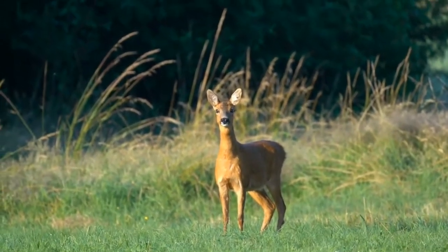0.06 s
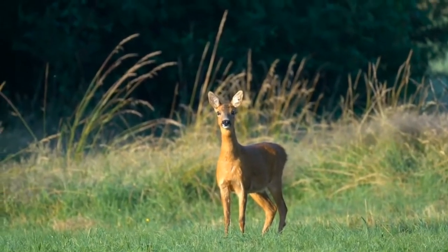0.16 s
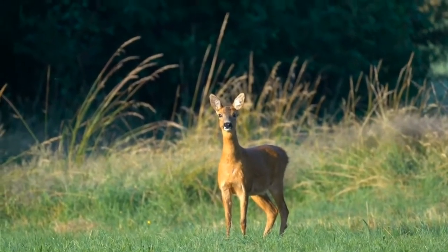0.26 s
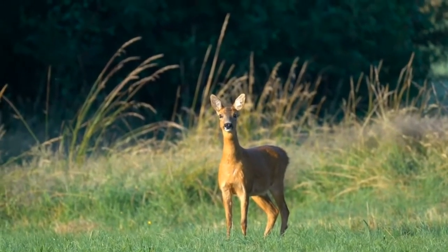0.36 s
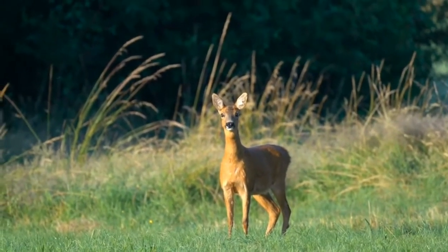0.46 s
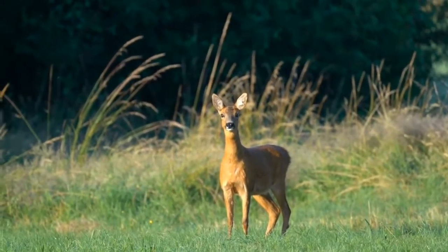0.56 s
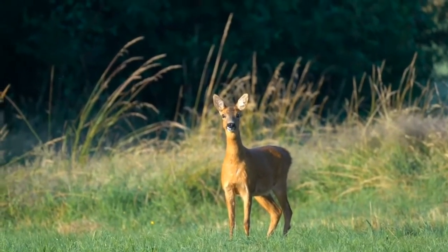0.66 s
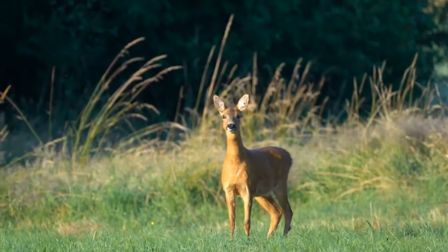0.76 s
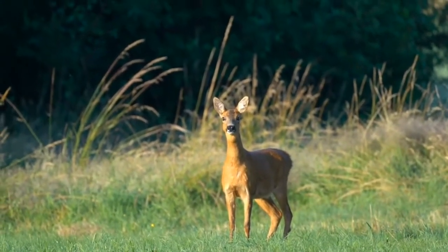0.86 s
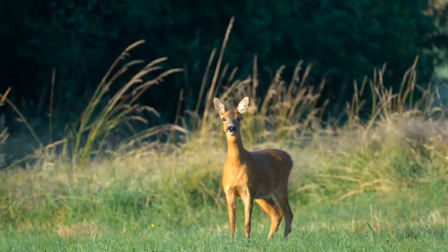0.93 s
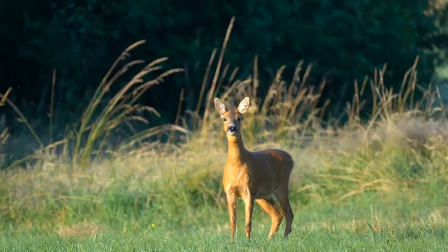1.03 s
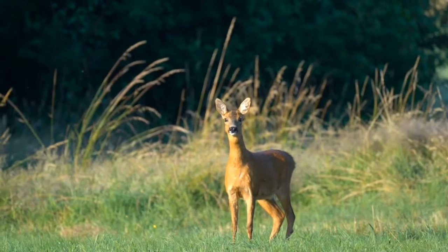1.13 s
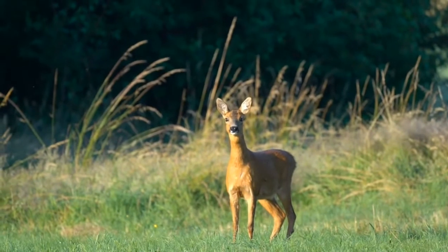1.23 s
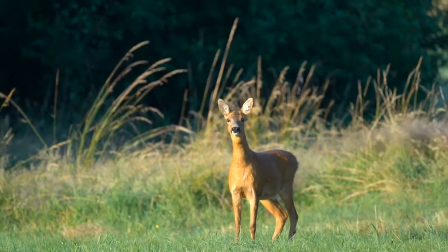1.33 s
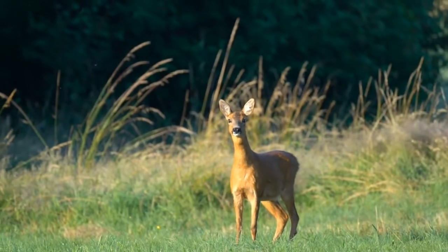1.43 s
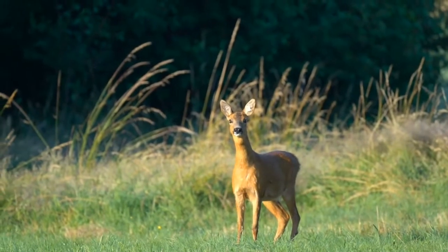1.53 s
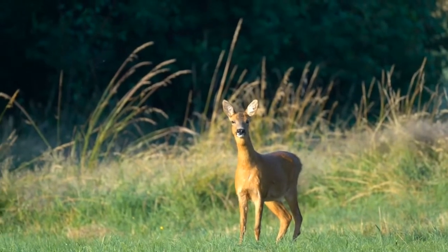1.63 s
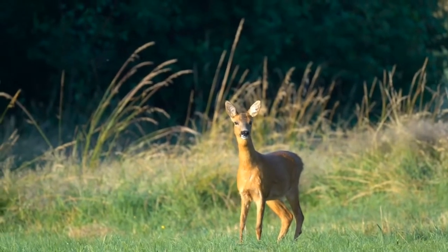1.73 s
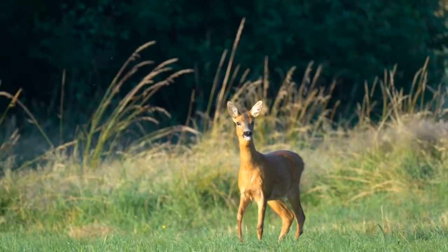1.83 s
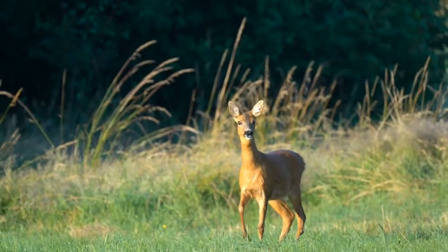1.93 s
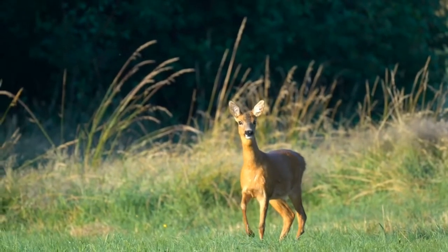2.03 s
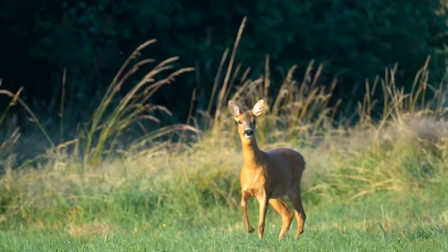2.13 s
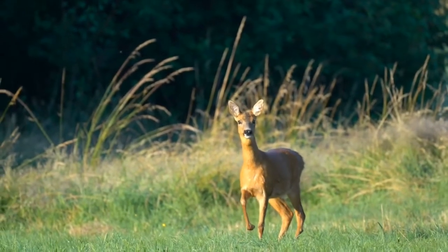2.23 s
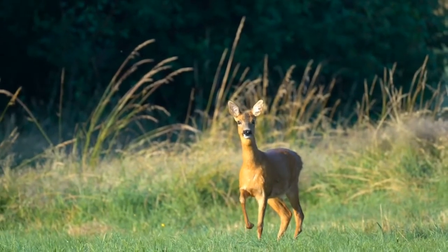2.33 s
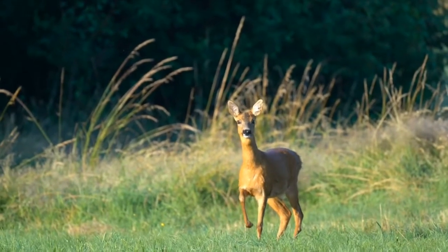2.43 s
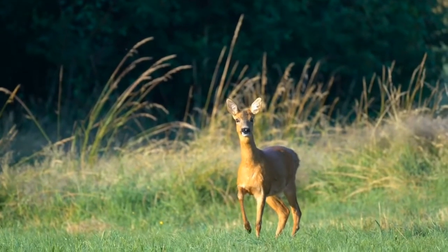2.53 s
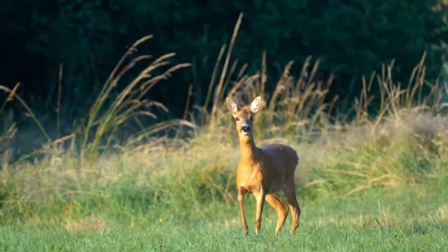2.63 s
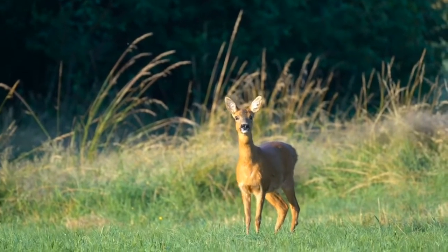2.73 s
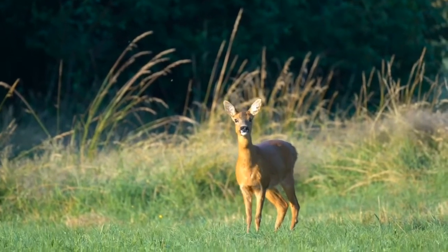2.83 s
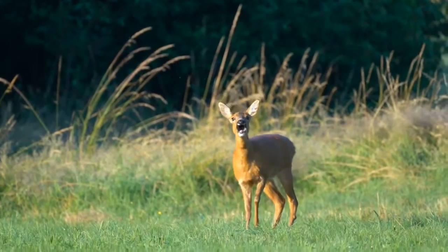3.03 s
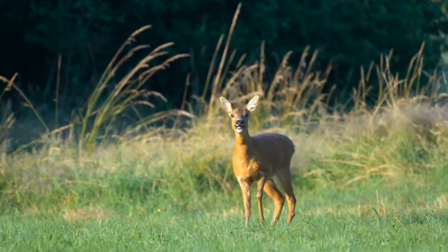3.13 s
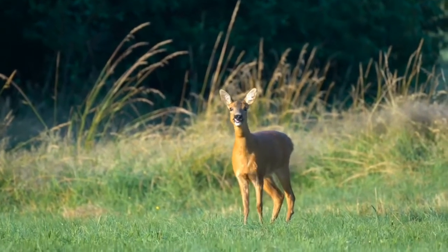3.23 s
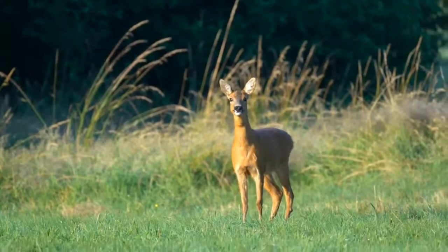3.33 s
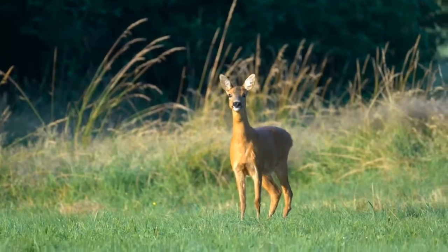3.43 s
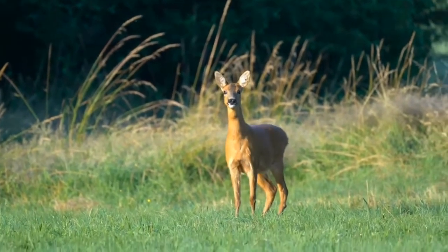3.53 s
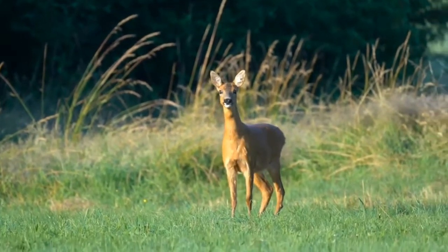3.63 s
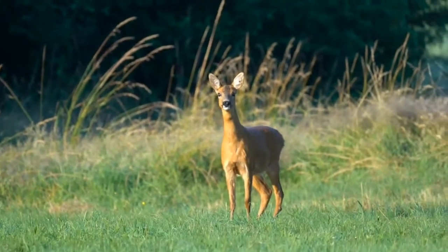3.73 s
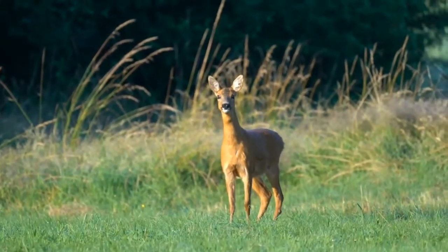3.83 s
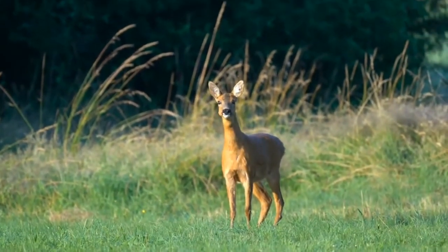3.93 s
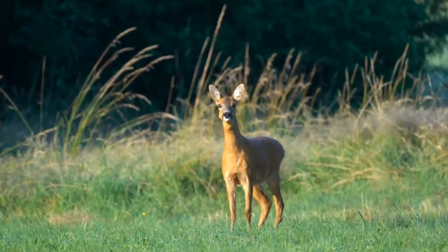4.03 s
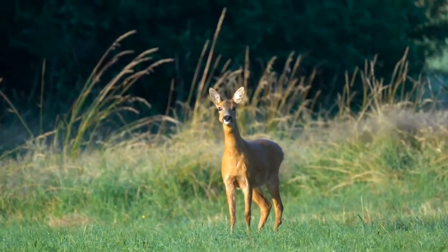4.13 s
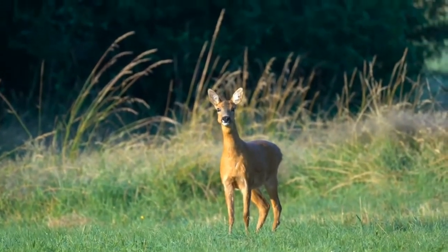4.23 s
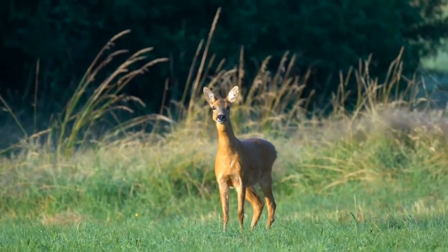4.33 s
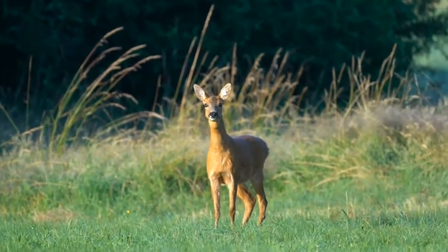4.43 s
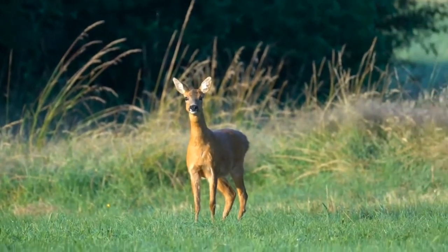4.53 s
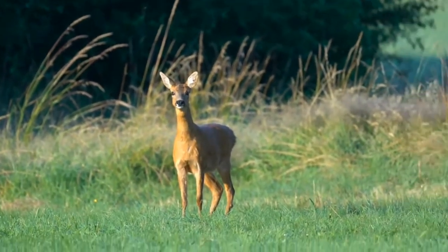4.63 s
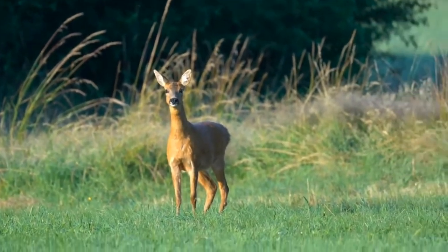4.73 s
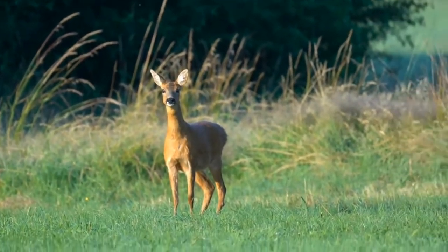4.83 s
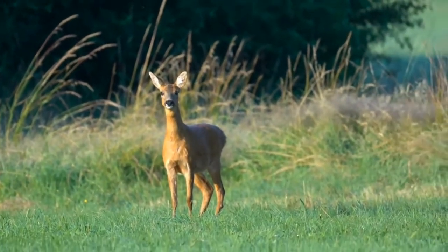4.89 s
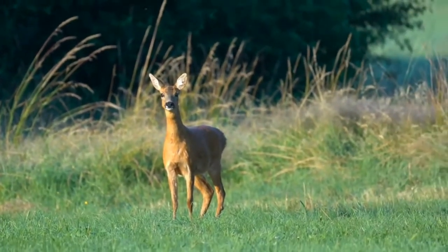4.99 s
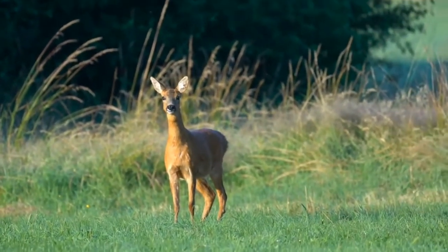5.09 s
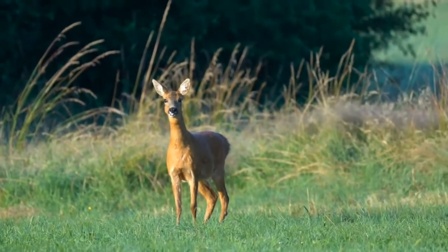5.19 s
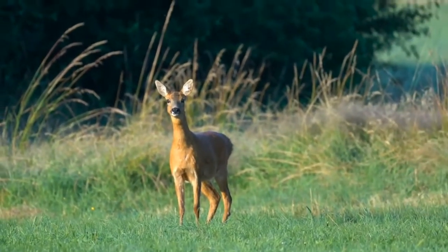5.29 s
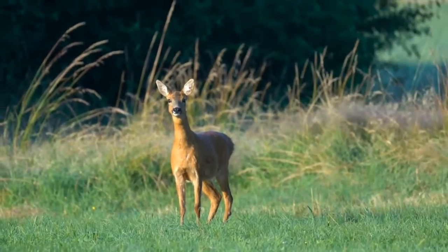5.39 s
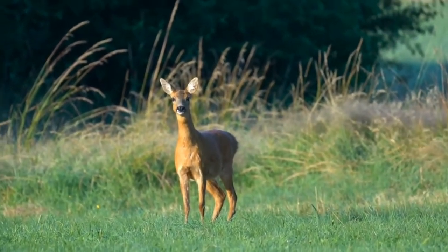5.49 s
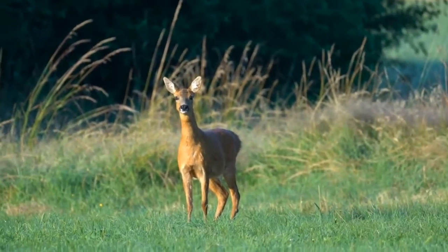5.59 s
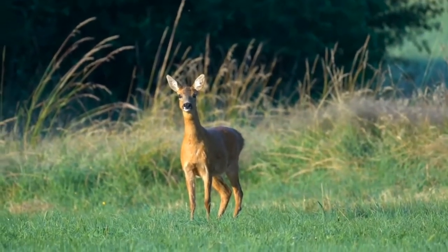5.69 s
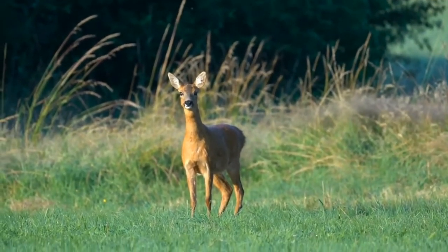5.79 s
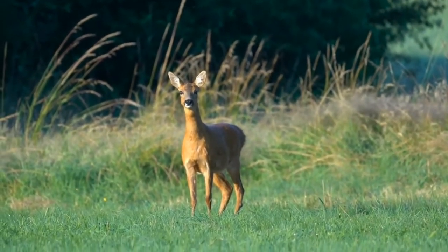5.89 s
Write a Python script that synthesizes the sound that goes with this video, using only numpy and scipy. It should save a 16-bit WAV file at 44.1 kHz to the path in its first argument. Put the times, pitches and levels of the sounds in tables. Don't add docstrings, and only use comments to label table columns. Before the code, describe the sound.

Quiet meadow with soft air, hiss and many faint bird chirps left, ahead and right, plus a faint insect hum and cricket rasps. Midway a roe deer lets out one rough, explosive bark, slightly right, and the wood edge returns a fading echo mostly from the left. Harsh chirps follow, then a hard click from the camera body beside the stereo microphone, and more chirps at right.

```python
import sys
import numpy as np
from scipy import signal
from scipy.fft import rfft, irfft
from scipy.io import wavfile
from scipy.ndimage import uniform_filter1d

SR = 44100
rng = np.random.default_rng(int(sys.argv[2]) if len(sys.argv) > 2 else 0)


def how_loud(loudness_db):
    steps = np.asarray(loudness_db, float) / 20
    return 10 ** steps


def file_out(sig):
    cols = np.atleast_2d(sig).T
    lim = np.clip(cols, -1, 1)
    pcm = np.round(lim * 32767).astype(np.int16)
    wavfile.write(sys.argv[1], SR, pcm)


N = 262395

# (time [s], peak level [dB], dullness corner [Hz])
TICKS = [
    (4.5847, -37, 19600),
    (4.5854, -23, 26300),
    (4.5865, -35.5, 2550),
    (4.587, -32.5, 2480),
    (4.5883, -49, 1500),
    (5.015, -50, 12000),
    (5.945, -40.5, 9000),
]


def rms_one(x):
    return x / np.sqrt(np.mean(x ** 2) + 1e-20)


def in_time(rows, outside=None):
    s, *columns = np.transpose(rows)
    t = np.arange(N) / SR
    return [np.interp(t, s, c, outside, outside) for c in columns]


def at_hz(points, hz, column=1):
    points = np.array(points)
    return np.interp(np.log(hz + 1), np.log(points[:, 0]), points[:, column])


def drift(rate_hz):
    r = np.exp(-2 * np.pi * rate_hz / SR)
    noise = rng.standard_normal(N + SR)
    return rms_one(signal.lfilter([1], [1, -2 * r, r * r], noise)[SR:])


def resonate(x, hz, width_hz):
    r = np.exp(-np.pi * width_hz / SR)
    zeros = [(1 - r * r) / 2, 0, (r * r - 1) / 2]
    poles = [1, -2 * r * np.cos(2 * np.pi * hz / SR), r * r]
    return signal.lfilter(zeros, poles, x + 1e-18)


def highpass(x, order, hz):
    return signal.lfilter(*signal.butter(order, hz, "high", fs=SR), x)


def bandpass(x, low_hz, high_hz):
    return signal.sosfilt(signal.butter(2, [low_hz, high_hz], "band", fs=SR, output="sos"), x)


def coloured(spectrum):
    white = rfft(rng.standard_normal(N))
    gain = how_loud(at_hz(spectrum, np.linspace(0, SR / 2, len(white))))
    return rms_one(irfft(white * gain, N))


def place(x, pan_db, side):
    lag_samples = 7
    left = np.roll(x, int(lag_samples * max(side, 0))) * how_loud(pan_db / 2)
    right = np.roll(x, int(lag_samples * max(-side, 0))) * how_loud(-pan_db / 2)
    return np.array([left, right])


def impulses(rows):
    out = np.zeros(N)
    for s, db in rows:
        out[round(s * SR)] = how_loud(db)
    return out


def air():
    # (time [s], level from the left [dB], level from the right [dB])
    air_level = [(0, -68, -63), (.4, -69.5, -65.5), (.6, -69, -74.5), (1.5, -67, -68), (2.2, -74.5, -70.5),
                 (3, -77, -69), (4, -70, -67.5), (4.9, -70.5, -66), (5.2, -73.5, -74), (5.95, -69.5, -66.5)]
    # (frequency [Hz], density [dB/Hz])
    air_colour = [(25, -37), (54, -31.5), (198, -15), (435, -5.5), (1370, -5.5), (4300, -9), (6000, -17),
                  (13200, -100)]
    # (frequency [Hz], density [dB/Hz])
    wind_colour = [(15, -60), (35, -7), (70, 14), (160, -4), (300, -16), (600, -90)]
    # (frequency [Hz], density [dB/Hz])
    hiss_colour = [(2060, -5.5), (3500, -1.5), (4100, -13), (5860, 0), (8150, -0.5), (15100, -3.5),
                   (16000, -7)]
    # (time [s], level [dB])
    hiss_drift = [(0, 3.5), (2.15, 1.7), (2.3, 0.7), (3, 1.1), (3.4, 2.5), (4, 2.5), (5.95, 1)]
    wind_db, hiss_db, hiss_side_db = -90, -69, -12.5

    left_db, right_db = in_time(air_level)
    left = place(coloured(air_colour) * how_loud(left_db + drift(23)), 5.2, -1.37)
    right = place(coloured(air_colour) * how_loud(right_db + drift(0.52)), -0.78, 0.83)
    diffuse = how_loud(-67) * np.array([coloured(air_colour), coloured(air_colour)])
    wind = np.array([how_loud(wind_db + drift(4.9)) * coloured(wind_colour) for port in range(2)])
    mid, side = coloured(hiss_colour), coloured(hiss_colour)
    hiss = how_loud(hiss_db + in_time(hiss_drift)[0]) * (mid + how_loud(hiss_side_db) * side * [[1], [-1]])
    return left + right + diffuse + wind + hiss


def hum():
    # (time [s], lower level [dB], upper level [dB])
    hum_level = [(.35, -100, -97), (.6, -77, -93), (.85, -77, -80), (2.15, -78, -79.5), (2.3, -88, -82),
                 (2.75, -80, -82), (2.95, -92, -78)]
    start_hz, sag_hz_per_s, upper_hz, upper_width_hz = 494, 7, 1026, 33
    low_db, high_db = in_time(hum_level, outside=-120)
    hz = start_hz - sag_hz_per_s * np.arange(N) / SR
    phase = 2 * np.pi * np.cumsum(hz * (1 + .004 * drift(14))) / SR
    low = np.sin(phase) * how_loud(low_db + 2.5 * drift(22))
    high = rms_one(resonate(rng.standard_normal(N), upper_hz, upper_width_hz))
    return place(np.sqrt(2) * low + high * how_loud(high_db), 1.0, 0)


def rasps():
    # (time [s], length [s], low edge [Hz], high edge [Hz], level [dB])
    bursts = [
        (0.093, 0.17, 4300, 9500, -68.5),
        (0.705, .15, 6200, 7400, -75.5),
        (1.027, 0.17, 6500, 7300, -76),
        (1.304, 0.16, 6000, 9400, -67),
        (1.924, 0.28, 6100, 9300, -72.5),
    ]
    out, t = np.zeros(N), np.arange(N) / SR
    noise = rng.standard_normal(N) * how_loud(1.7 * drift(30))
    for s, length, low_hz, high_hz, db in bursts:
        u = (t - s) / length * 2 - 1
        out += how_loud(db) * rms_one(bandpass(noise, low_hz, high_hz)) * np.sqrt((1 - u ** 2).clip(0))
    return place(out, -4.5, 0)


def glides(rows, done_halfway=.56):
    return [(s, length, a, a + done_halfway * (b - a), b, db) for s, length, a, b, db in rows]


def pips(rows):
    return [(s, length, hz, hz, hz, db) for s, length, hz, db in rows]


def dips(rows):
    start_ratio, end_ratio = 1 + 0.115, 1 + 0.063
    return [(s, length, hz * start_ratio, hz, hz * end_ratio, db) for s, length, hz, db in rows]


def birds(notes, warble, warble_hz, flutter_db, ring_db, ring_s):
    out, wobble, flutter = np.zeros(N), drift(warble_hz), drift(warble_hz)
    for s, length, start_hz, mid_hz, end_hz, db in notes:
        at = np.arange(round(s * SR), min(round((s + length) * SR), N))
        u = (at / SR - s) / length * 2 - 1
        hz = mid_hz + (end_hz - start_hz) / 2 * u + ((end_hz + start_hz) / 2 - mid_hz) * u ** 2
        tone = np.sin(2 * np.pi * np.cumsum(hz * (1 + warble * wobble[at])) / SR)
        swell = (1 - u ** 2).clip(0) ** 0.19
        out[at] += np.sqrt(2) * how_loud(db + flutter_db * flutter[at]) * swell * tone
    t = np.arange(SR // 2) / SR
    leaves = rng.standard_normal(len(t)) * how_loud(-60 * t / ring_s)
    return out + how_loud(ring_db) * signal.fftconvolve(out, leaves / np.linalg.norm(leaves))[:N]


def left_bird():
    # (time [s], length [s], start [Hz], end [Hz], level [dB])
    slides = [(.141, 0.027, 3380, 3950, -58.5), (.334, 0.027, 3420, 4030, -64),
              (.535, 0.027, 3380, 3630, -61), (.562, 0.034, 3660, 3560, -60),
              (.538, 0.0091, 4470, 5560, -63), (.655, 0.013, 5120, 4150, -57.5),
              (.765, 0.018, 4900, 5000, -68), (.981, 0.052, 2950, 3070, -64),
              (1.055, 0.012, 5400, 4800, -68), (1.07, .014, 4900, 4700, -63),
              (2.938, 0.02, 3480, 3420, -67), (3.77, 0.015, 2110, 1900, -61)]
    # (time [s], length [s], lowest pitch [Hz], level [dB])
    dipping = [
        (2.162, 0.075, 2930, -65),
        (2.372, 0.075, 2780, -67),
    ]
    return place(birds(glides(slides) + dips(dipping), 0.017, 110, 2.3, -3.0, .55), 6.4, -0.86)


def birds_ahead():
    # (time [s], length [s], start [Hz], end [Hz], level [dB])
    slides = [(.222, .01, 5300, 4400, -70), (.23, 0.06, 4300, 3690, -66), (2.872, 0.054, 3200, 3040, -69.5),
              (.379, 0.0215, 4770, 5300, -61.5), (.398, 0.052, 5240, 4680, -61),
              (.398, 0.071, 4460, 3760, -63.5), (.246, .03, 8400, 7900, -66), (.49, 0.035, 3400, 3140, -72),
              (.55, 0.03, 4670, 4130, -68), (.632, 0.0072, 6640, 5000, -60),
              (.843, 0.067, 4000, 3480, -67.5), (1.154, 0.014, 2760, 2440, -59),
              (1.262, 0.023, 3810, 3430, -65.5), (1.385, .07, 4000, 4280, -71),
              (2.56, 0.024, 3770, 3400, -70), (3.622, 0.016, 2870, 2700, -66),
              (5.708, 0.037, 3660, 4020, -68.5), (5.928, 0.013, 5420, 5570, -59),
              (.288, .06, 3720, 3560, -74)]
    # (time [s], length [s], pitch [Hz], level [dB])
    level_notes = [(.133, .01, 4400, -66), (.179, 0.022, 3560, -64), (.226, .029, 7600, -73),
                   (.969, 0.01, 4700, -68), (.979, 0.019, 4100, -71), (1.165, 0.019, 3530, -65.5),
                   (1.193, 0.0048, 3460, -65), (1.208, 0.014, 3240, -68), (1.322, .017, 4640, -70),
                   (1.37, .026, 3600, -66.5), (1.581, .0093, 4650, -65), (1.593, 0.014, 1870, -69.5),
                   (1.669, 0.021, 4660, -72.5), (2.32, 0.04, 2950, -73), (1.965, .05, 2150, -72),
                   (2.852, 0.022, 3130, -73), (4.195, 0.032, 3550, -70.5), (4.44, 0.056, 2874, -69.5),
                   (4.665, 0.019, 3010, -71), (4.73, 0.034, 3090, -72), (4.99, 0.06, 3240, -77)]
    return place(birds(glides(slides) + pips(level_notes), 0.015, 170, 2.2, -4, 0.5), -3.1, 0)


def right_bird():
    # (time [s], length [s], start [Hz], end [Hz], level [dB])
    slides = [(.11, 0.0074, 2460, 2460, -56), (.124, .028, 2580, 2710, -53.5),
              (.161, .014, 6300, 5740, -75), (.568, 0.012, 5980, 5590, -68.5),
              (.6392, 0.00069, 8200, 7800, -47.5), (.748, 0.013, 2900, 2450, -54),
              (.78, 0.014, 2010, 2550, -58), (.788, 0.013, 2440, 2860, -54),
              (.802, 0.013, 2960, 3370, -51.5), (.366, 0.0098, 5000, 6000, -62),
              (.873, 0.034, 2410, 1770, -66), (.905, 0.047, 3060, 3430, -65),
              (1.195, 0.057, 2010, 1810, -65.5), (1.85, 0.1, 1800, 2210, -70),
              (1.919, 0.085, 2286, 2470, -69.5), (2.09, 0.057, 2540, 2200, -66),
              (5.328, 0.015, 4620, 5270, -62), (5.344, 0.0091, 5180, 4640, -62),
              (3.845, 0.018, 2580, 3050, -68), (5.045, 0.045, 4470, 5730, -74),
              (5.457, .008, 4750, 5050, -64), (5.468, .01, 5100, 5400, -65), (5.12, 0.04, 5780, 5000, -68),
              (5.235, 0.034, 4340, 4200, -56.5), (5.745, 0.011, 5800, 4470, -59.5),
              (5.76, 0.013, 5400, 4320, -58), (5.772, 0.012, 5000, 4230, -62)]
    # (time [s], length [s], start [Hz], end [Hz], level [dB])
    hooks = [
        (.203, .012, 2950, 2300, -59),
        (.213, 0.042, 2242, 1993, -61.5),
        (5.352, 0.029, 4600, 3754, -57),
    ]
    # (time [s], length [s], pitch [Hz], level [dB])
    level_notes = [(.791, 0.054, 1830, -72), (.815, 0.021, 3240, -63), (1.011, 0.03, 3780, -63.5),
                   (1.035, 0.011, 1800, -67), (1.05, 0.0094, 1980, -64), (1.074, 0.012, 2210, -60.5),
                   (1.092, 0.014, 2170, -60), (1.28, 0.046, 2430, -65), (2.15, 0.055, 2030, -73),
                   (5.249, 0.023, 3530, -67), (.377, .034, 5900, -61), (5.437, 0.016, 4210, -59.5),
                   (5.784, 0.013, 3440, -59)]
    # (time [s], length [s], lowest pitch [Hz], level [dB])
    dipping = [
        (5.565, 0.081, 3076, -66),
    ]
    notes = glides(slides) + glides(hooks, done_halfway=0.79) + pips(level_notes) + dips(dipping)
    return place(birds(notes, 0.02, 190, 3.2, -5, 0.5), -9.0, 1.0)


def sparrow():
    # (time [s], length [s], top [Hz], level [dB])
    upstrokes = [(3.835, 0.017, 5300, -67), (3.852, 0.0146, 5900, -64), (3.951, 0.0079, 6210, -55.5),
                 (4.288, 0.0097, 6000, -65)]
    # (time [s], length [s], top [Hz], level [dB])
    downstrokes = [(3.864, .014, 6130, -54), (3.874, 0.0083, 5680, -60), (3.958, 0.0089, 6480, -57),
                   (4.1, .007, 5770, -64), (4.301, 0.0084, 6060, -62)]
    # (time [s], length [s], pitch [Hz], level [dB])
    level_notes = [(3.845, 0.018, 4640, -60), (3.9315, 0.007, 4900, -50.5), (4.077, 0.012, 5350, -65),
                   (4.088, 0.011, 5650, -63), (4.196, 0.006, 5200, -72), (4.275, 0.015, 4990, -59.5)]
    low_hz = 4464
    up = [(s, length, low_hz, hz, db) for s, length, hz, db in upstrokes]
    down = [(s, length, hz, low_hz, db) for s, length, hz, db in downstrokes]
    return place(birds(glides(up + down) + pips(level_notes), 0.025, 490, 4.8, -6.5, 0.2), 1.3, -1)


def buzzes():
    # (time [s], length [s], start [Hz], end [Hz], level [dB])
    ahead = [(.65, .01, 4200, 4130, -61), (.658, 0.0115, 4050, 3700, -62.5),
             (.671, 0.0288, 3250, 2550, -59), (0.78, .03, 6300, 4500, -76), (3.747, .025, 3150, 2800, -64),
             (3.749, .016, 2750, 2250, -62), (3.77, .006, 4000, 2000, -63), (1.4, 0.12, 4700, 4500, -76),
             (1.15, .04, 3300, 3500, -72), (5.938, .014, 5500, 6100, -55)]
    # (time [s], length [s], start [Hz], end [Hz], level [dB])
    right = [
        (5.215, 0.027, 4400, 4300, -64),
        (5.533, 0.031, 4030, 3940, -59),
        (5.852, 0.078, 3240, 3350, -65),
    ]
    ahead_sound = place(birds(glides(ahead), 0.0434, 390, 4.9, -3.5, .55), -3.2, 0)
    return ahead_sound + place(birds(glides(right), .035, 270, 3.4, -14, 0.3), -8.0, 1)


def ticks():
    # (frequency [Hz], level [dB], t60 [s])
    body_modes = [(288, -28, 0.14), (1280, -10, 0.034), (2030, 1.5, 0.0063), (2700, -12, 0.0037),
                  (3330, -3.5, 0.012), (4160, -1, 0.017), (5300, 20.5, 0.0046), (7150, 15, 0.0065),
                  (9750, 29, 0.0014), (12800, 19, 0.0045)]
    out, t = np.zeros(N), np.arange(SR // 30) / SR
    for s, db, dull_hz in TICKS:
        tick = 0
        for hz, mode_db, t60 in body_modes:
            decay = how_loud(mode_db - 60 * t / t60 - 5.3 * (hz / dull_hz) ** 2)
            tick = tick + decay * np.sin(2 * np.pi * hz * t)
        piece = out[round(s * SR):][:len(t)]
        piece += how_loud(db) * tick[:len(piece)] / np.abs(tick).max()
    return highpass(out, 2, 220)


def settles():
    # (time [s], peak level [dB])
    shifts = [
        (4.5885, -50),
        (4.9002, -44),
        (4.9012, -46),
    ]
    # (frequency [Hz], level [dB], t60 [s])
    strap_modes = [(790, 1, .02), (2150, -3, .007), (2950, 1, .008), (3450, -5, .005), (5100, 1, .007)]
    t = np.arange(SR // 30) / SR
    knock = sum(how_loud(db - 60 * t / t60) * np.sin(2 * np.pi * hz * t) for hz, db, t60 in strap_modes)
    knock = highpass(knock, 2, 500)
    return signal.lfilter(knock / np.abs(knock).max(), [1], impulses(shifts))


def shell(x):
    flex_hz, flex_width_hz, flex_db = 2090, 900, 1
    hard = impulses([(s, db - 7.3 * (4000 / dull_hz) ** 2) for s, db, dull_hz in TICKS])
    unit_peak = resonate(np.eye(1, 40)[0], flex_hz, flex_width_hz).max()
    flex = resonate(hard, flex_hz, flex_width_hz) / unit_peak
    return place(x, -1.6, 0) + how_loud(flex_db) * flex * [[1], [-1]] + how_loud(-8.0) * x * [[-1], [1]]


def throat(source):
    # (frequency [Hz], width [Hz], level [dB])
    formants = [(690, 85, -9), (1220, 227, -5), (1922, 144, 3), (2820, 184, -5), (4140, 740, -25),
                (6100, 760, -24.5), (9800, 1500, -35), (13700, 830, -46)]
    voiced = 0
    for k, (hz, width_hz, db) in enumerate(formants):
        voiced = voiced + (-1) ** k * how_loud(db) * resonate(source, hz, width_hz)
    return signal.sosfilt(signal.butter(4, 520, "high", fs=SR, output="sos"), voiced)


def slap(rows):
    bite_to_snap = .25
    hardest_db, snap_loss_db_per_db = -15, .1
    snap_hz, snap_width_hz, snap_db, edge_db = 2650, 850, 3, -31
    hard = impulses([(s, db + snap_loss_db_per_db * min(db - hardest_db, 0) + bite_to_snap * bite_db)
                     for s, db, bite_db in rows])
    ring = impulses([(s, db - (1 - bite_to_snap) * bite_db) for s, db, bite_db in rows])
    snap = highpass(resonate(hard, snap_hz, snap_width_hz), 2, 1400)
    edge = signal.lfilter(*signal.butter(1, [4600, 10000], "band", fs=SR), hard)
    soft = signal.lfilter(*signal.butter(4, 3250, fs=SR), throat(ring) + how_loud(snap_db) * snap)
    return soft + how_loud(edge_db) * edge


def bark():
    # (time [s], level [dB], mouth brightness [dB])
    effort = [
        (3.085, -82, 0),
        (3.099, -41, 0),
        (3.112, -36, 2),
        (3.126, -28.5, 3),
        (3.2, -30.5, 5),
        (3.236, -28.5, 7),
        (3.292, -30.5, 1),
        (3.308, -46, 4),
    ]
    # (time [s], peak level [dB], bite: snap over throat ring [dB])
    slaps = [(3.1005, -38, -6), (3.1073, -35, 5), (3.1113, -30, 0), (3.1174, -26, 4), (3.1231, -20, -1),
             (3.1285, -22, -6), (3.1333, -19.5, -1), (3.1363, -24, -4), (3.1424, -26, 0), (3.1476, -22, -3),
             (3.1527, -19, 2), (3.162, -18, 0), (3.1672, -16.5, 6), (3.1699, -22, 0), (3.1772, -27, -3),
             (3.185, -23, -1), (3.1902, -16, 2), (3.1938, -22, -8), (3.2031, -26, -5), (3.2097, -24, 5),
             (3.2136, -16.5, 4), (3.2231, -18, 10), (3.2238, -19, 8), (3.2279, -15, 5), (3.2331, -17, 5),
             (3.2374, -24, 0), (3.2432, -27, 0), (3.2469, -17, 5), (3.2524, -20, -1), (3.2565, -22, -9),
             (3.2616, -24, 1), (3.2662, -23, 3), (3.273, -26, 0), (3.2776, -20, 0), (3.2896, -20.5, -4),
             (3.2927, -26, -2)]
    fold_hz, fold_jitter, fold_spread_db, breath_db = 230, .35, 2.5, 6.0
    hoarse_db, closure_db, even_s, even_share = -9, 2.5, .005, .5

    level_db, bright_db = in_time(effort, outside=-120)
    cycles = np.cumsum(fold_hz * (1 + fold_jitter * drift(150)).clip(.2) / SR)
    pulses = np.diff(np.floor(cycles), prepend=0) * how_loud(fold_spread_db * rng.standard_normal(N))
    puffs = signal.lfilter([1], [1, -.994], pulses) * rng.standard_normal(N)
    roar = rms_one(throat(rms_one(pulses) + how_loud(breath_db) * rms_one(puffs)))
    swell = uniform_filter1d(roar ** 2, size=round(even_s * SR)).clip(1e-6) ** (even_share / 2)
    hoarse = rms_one(roar / swell) * how_loud(level_db + hoarse_db)
    highs = highpass(hoarse, 1, 2300)
    unit_peak = np.abs(slap([(0, 0, 0)])).max()
    return hoarse + (how_loud(bright_db) - 1) * highs - how_loud(closure_db) * slap(slaps) / unit_peak


def direct(x):
    shade_hz, shade_db = 1110, -9.5
    low = signal.lfilter(*signal.butter(1, shade_hz, fs=SR), x)
    return np.array([low + how_loud(shade_db) * (x - low), x])


def grass(x):
    grass_hz, t60_s, level_db, flutter_hz = 3600, .045, -5.0, 250
    t = np.arange(SR // 20) / SR
    blades = rng.standard_normal((2, len(t))) * how_loud(-60 * t / t60_s)
    blades = blades / np.linalg.norm(blades, axis=1, keepdims=True)
    scattered = signal.fftconvolve(highpass(x, 2, grass_hz)[None], blades, axes=1)[:, :N]
    return how_loud(level_db) * scattered * [drift(flutter_hz), drift(flutter_hz)]


def wood(x):
    # (frequency [Hz], t60 [s], left level [dB], right level [dB])
    wood_bands = [(500, 1.77, 7.5, 3.5), (650, 1.49, 10.5, 8.5), (930, 1.58, 7, 1), (1324, 1.49, 6.5, 0.5),
                  (1640, 1.16, -4, -4), (1970, 1.11, 4.5, -2), (2300, 0.76, 1.5, 1), (2710, 0.62, 2, -2.5),
                  (5000, 0.71, 2, -2), (12000, 0.64, 3, 0)]
    # (delay [s], level [dB])
    wood_depth = [(0, 0), (.4, 1), (.5, -2.0), (2, -1.0)]
    rise_s, sway_s, sway_hz = 0.063, .00022, 28
    size = 2 * SR
    t = np.arange(size) / SR
    shared, own = rng.standard_normal(size), rng.standard_normal((2, size))
    noise = place(shared, 0, -0.75) * 1.02 + own * 0.37
    edges_hz, echo = 420 * 2 ** (np.arange(21) / 4), 0
    for low_hz, high_hz in zip(edges_hz, edges_hz[1:]):
        hz = np.sqrt(low_hz * high_hz)
        sides = how_loud(np.array([[at_hz(wood_bands, hz, column)] for column in (2, 3)]))
        decay = how_loud(-60 * t / at_hz(wood_bands, hz))
        echo = echo + sides * bandpass(noise, low_hz, high_hz) * decay
    rise = 1 - np.exp(-(t / rise_s) ** 2)
    echo = echo * rise * how_loud(np.interp(t, *np.transpose(wood_depth))) / np.sqrt(SR / 10)
    heard = signal.fftconvolve(x[None], echo, axes=1)[:, :N]
    path = np.arange(N) + sway_s * SR * drift(sway_hz)
    return np.array([np.interp(path, np.arange(N), port) for port in heard])


def scene():
    background = air() + hum() + rasps()
    songbirds = left_bird() + birds_ahead() + right_bird() + sparrow() + buzzes()
    camera = shell(ticks() + settles())
    voice = bark()
    deer = direct(voice) + grass(voice) + wood(voice)
    return background + songbirds + camera + deer


def gain_steps():
    # (beat number [-], thud level [dB], edge level [dB], left over right [dB])
    steps = [(0, -50.5, -50, -7), (1, -65, -50, -3), (2, -51, -56, -3.5), (3, -65, -47, 14),
             (4, -44, -47, -4.5), (5, -61, -55, -12), (6, -57, -51, 4), (8, -62, -40, 6), (10, -58, -62, 6),
             (11, -61, -46, 13), (13, -65, -44, 5), (15, -68, -35, -4), (17, -56.5, -60, 8),
             (19, -69, -62, 13)]
    clock_start_s, clock_s = 3.1405, .02108
    out, k = np.zeros((2, N)), np.arange(80)
    for beat, thud_db, edge_db, pan_db in steps:
        start = round((clock_start_s + beat * clock_s) * SR)
        click = how_loud(thud_db + 20.5) * 0.84 ** k + how_loud(edge_db) * (k == 0)
        out[:, start:start + 80] += how_loud(np.array([[pan_db / 2], [-pan_db / 2]])) * click
    return out


def roll_off(x):
    return signal.sosfilt(signal.butter(12, 16700, fs=SR, output="sos"), x)


def record(dry):
    top_cut = signal.cheby2(14, 40, 16050, fs=SR, output="sos")
    mix = signal.sosfilt(top_cut, dry + gain_steps())
    return roll_off(mix)


dry = scene()
out = record(dry)
file_out(out)
```